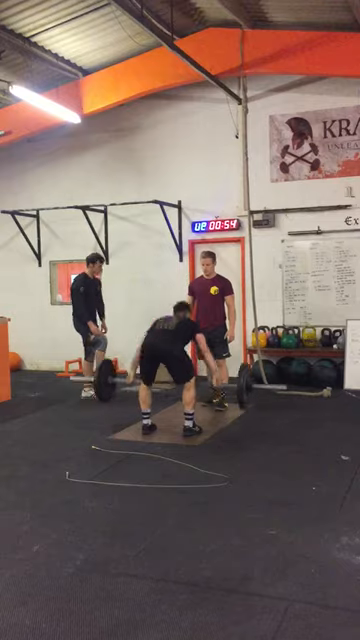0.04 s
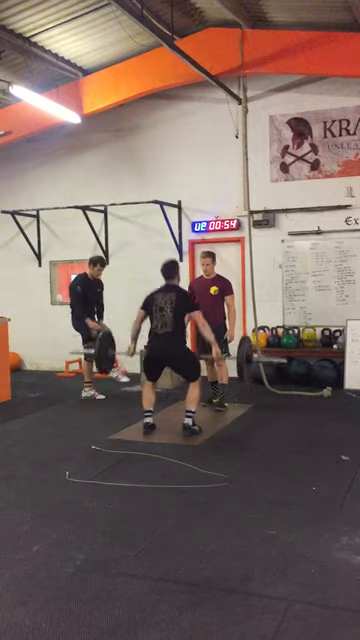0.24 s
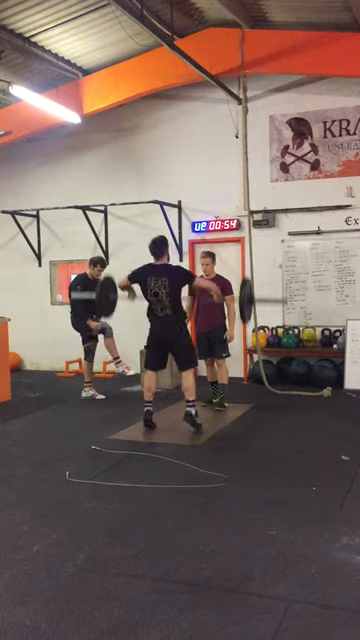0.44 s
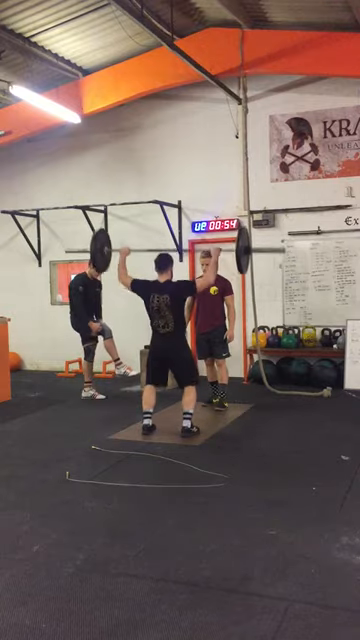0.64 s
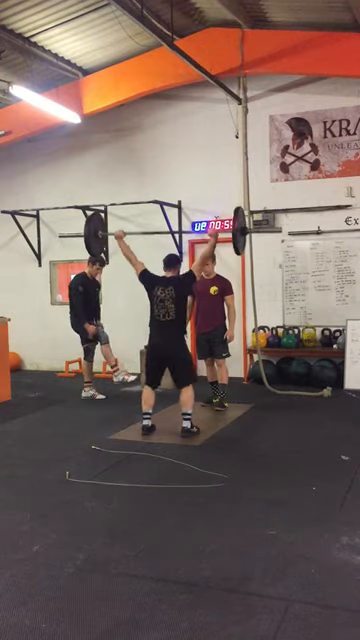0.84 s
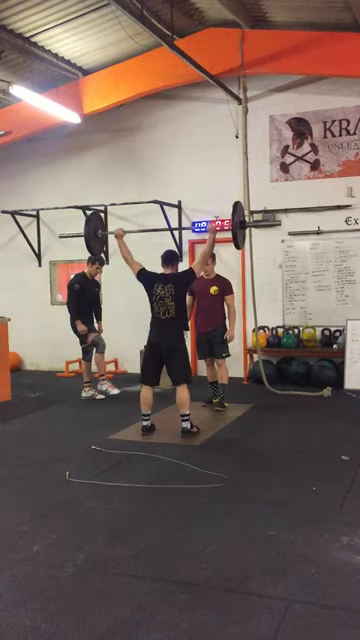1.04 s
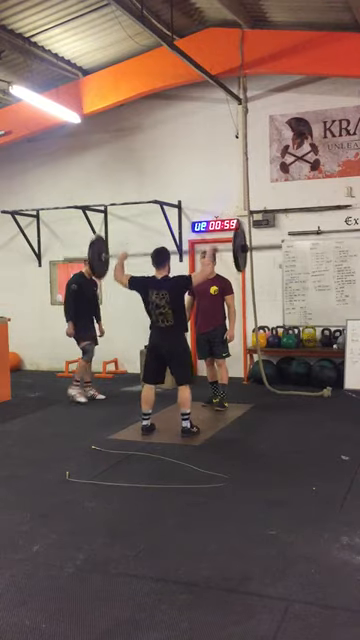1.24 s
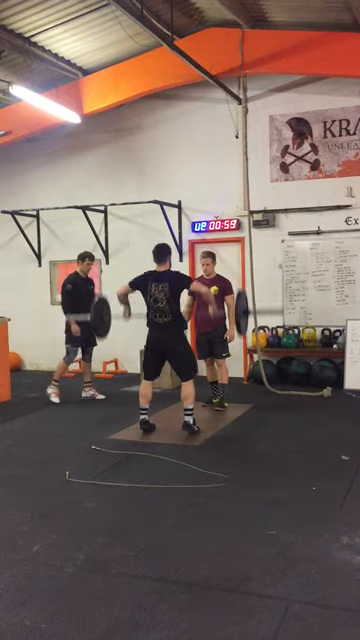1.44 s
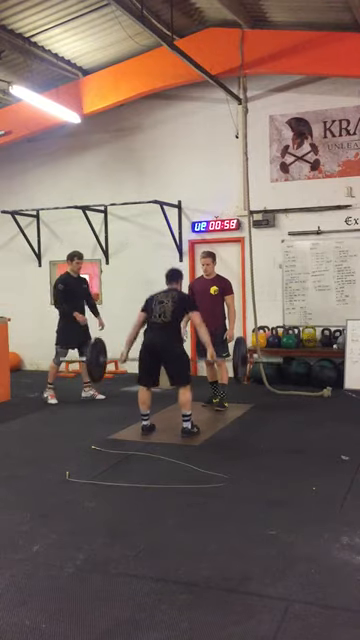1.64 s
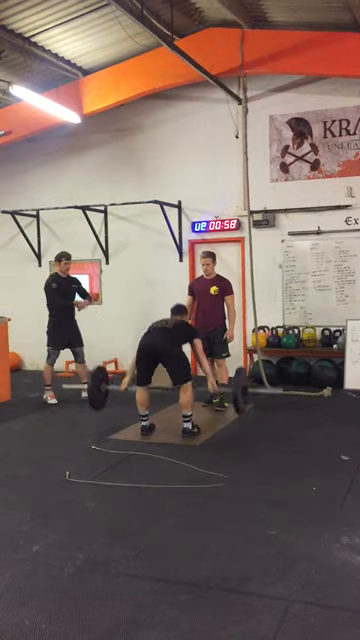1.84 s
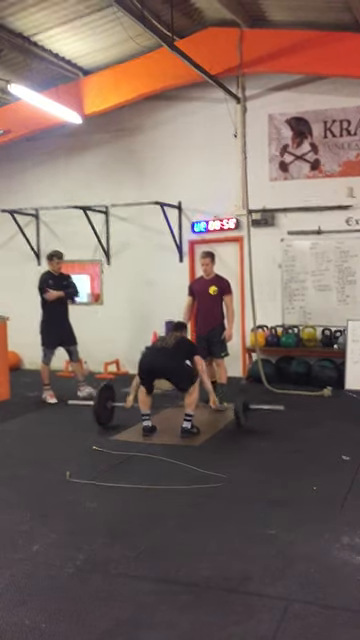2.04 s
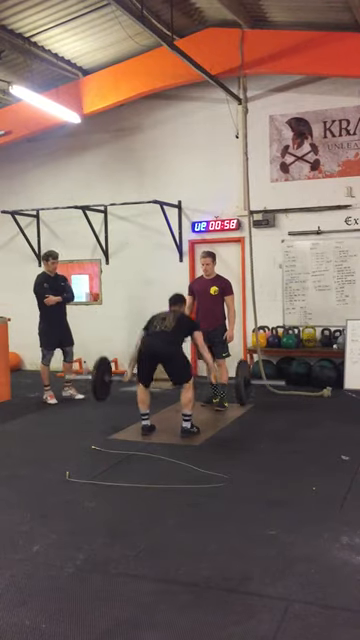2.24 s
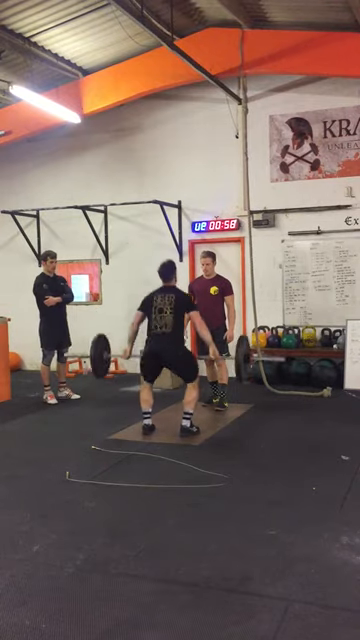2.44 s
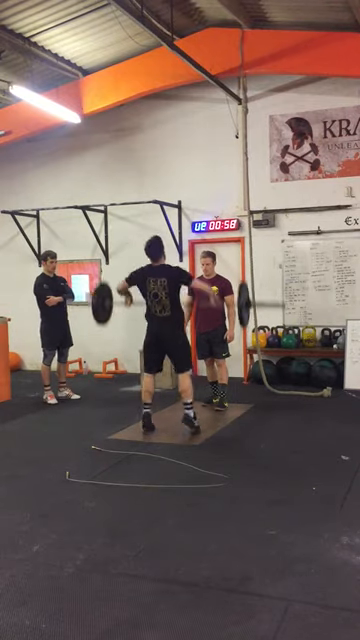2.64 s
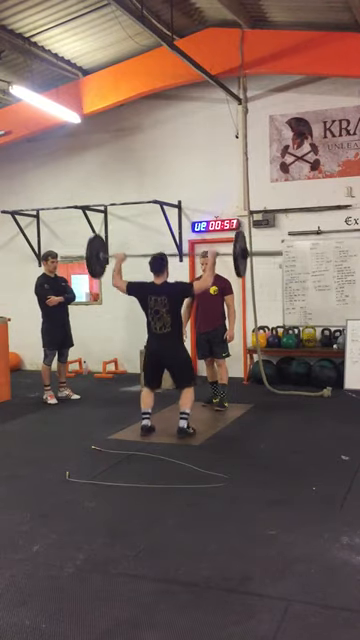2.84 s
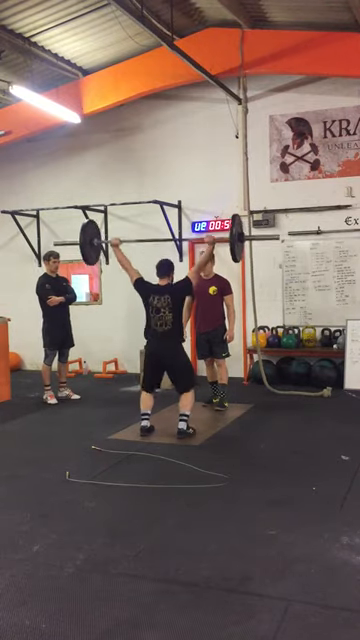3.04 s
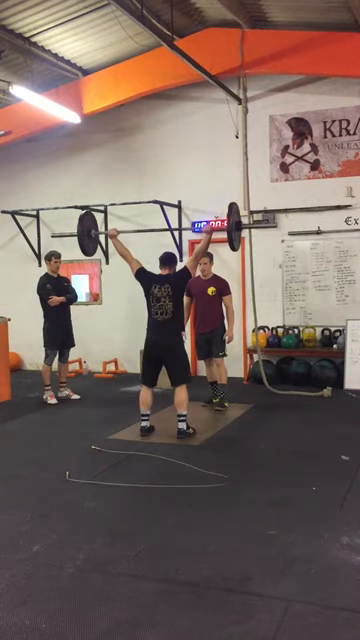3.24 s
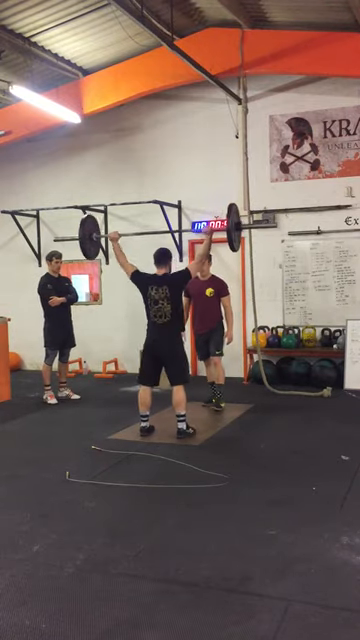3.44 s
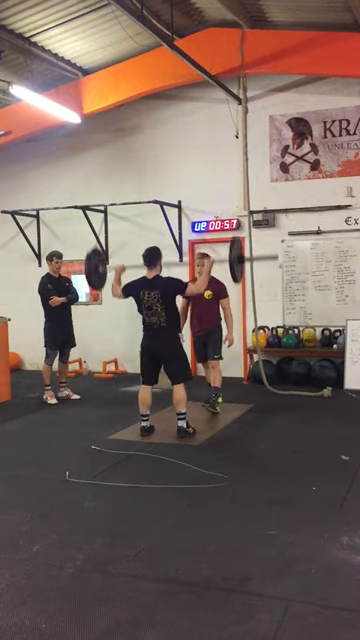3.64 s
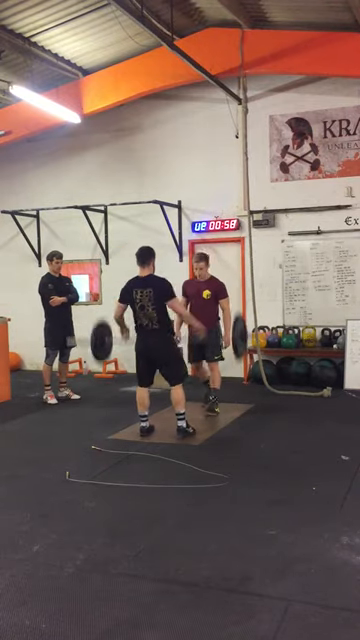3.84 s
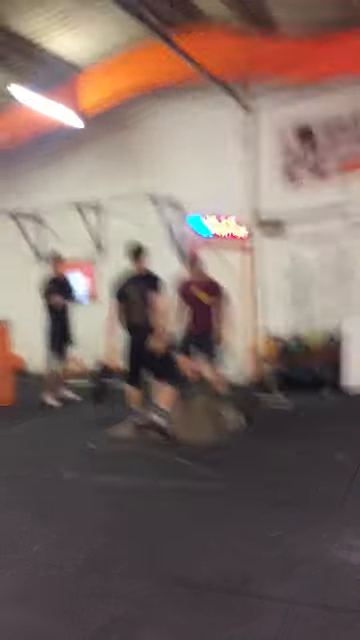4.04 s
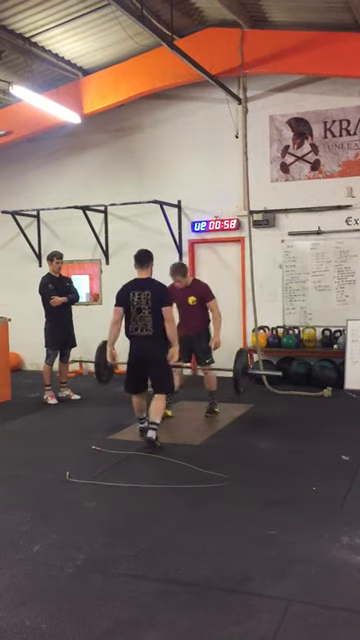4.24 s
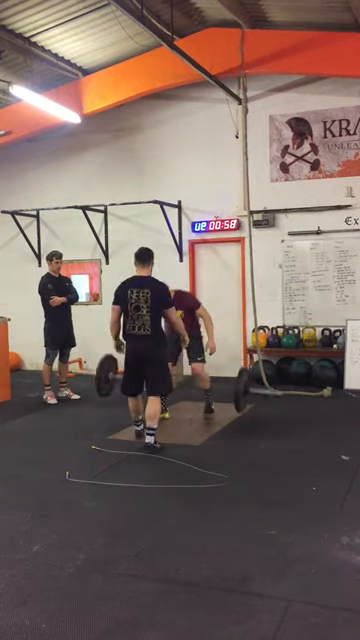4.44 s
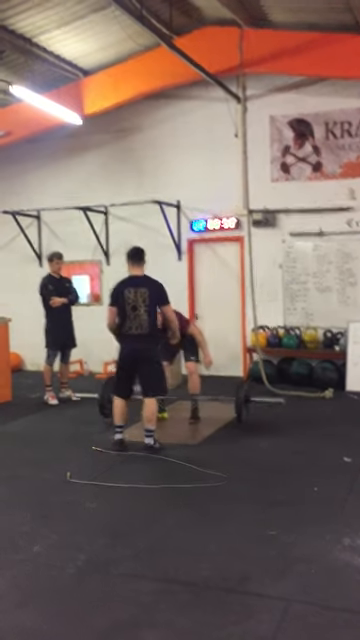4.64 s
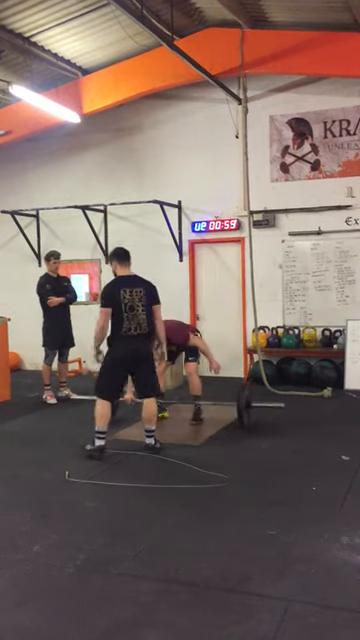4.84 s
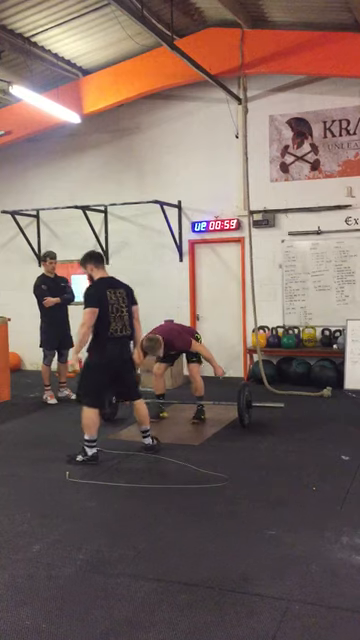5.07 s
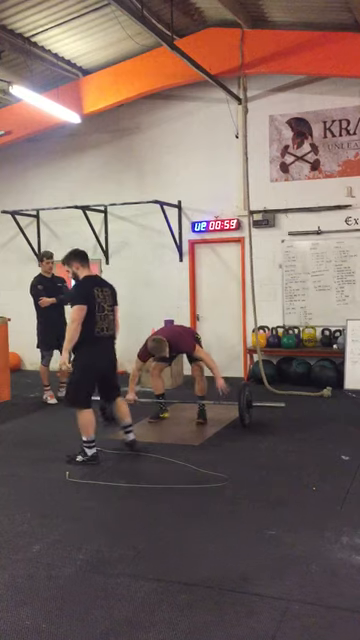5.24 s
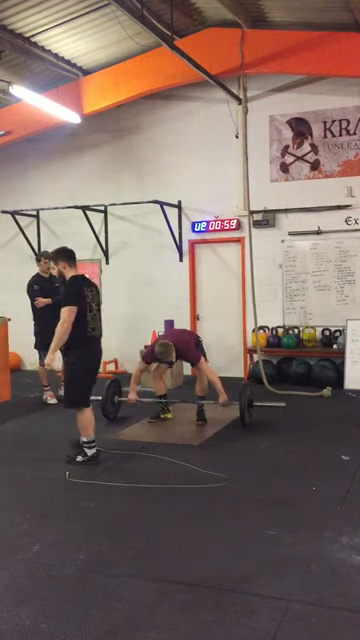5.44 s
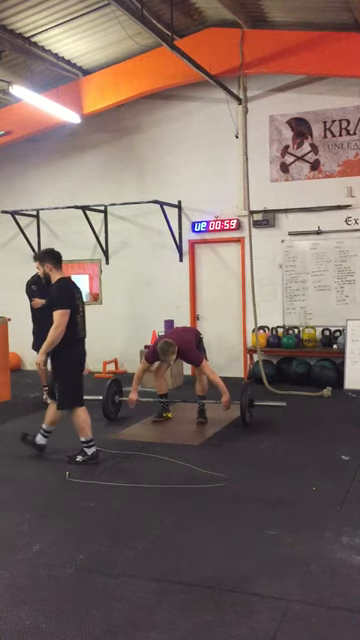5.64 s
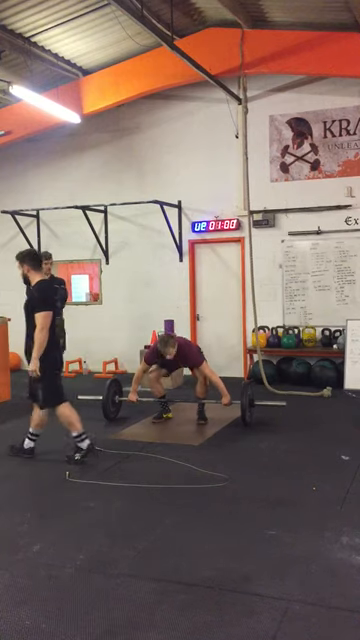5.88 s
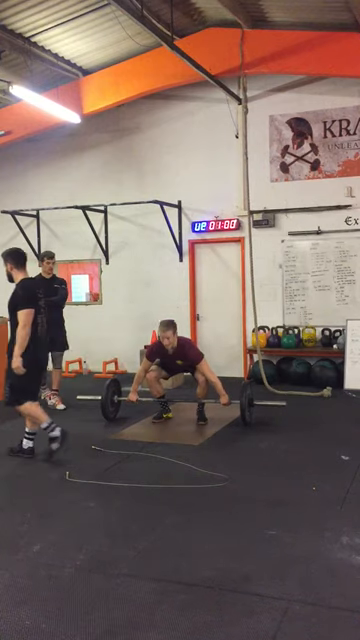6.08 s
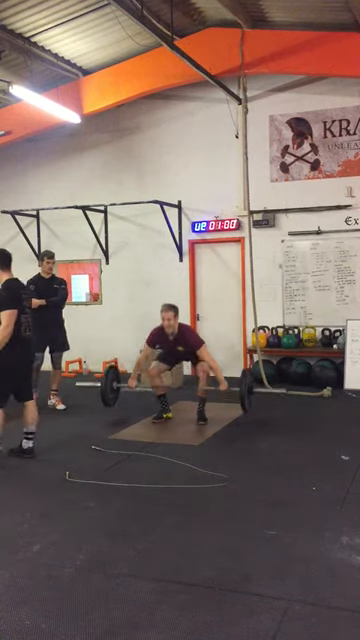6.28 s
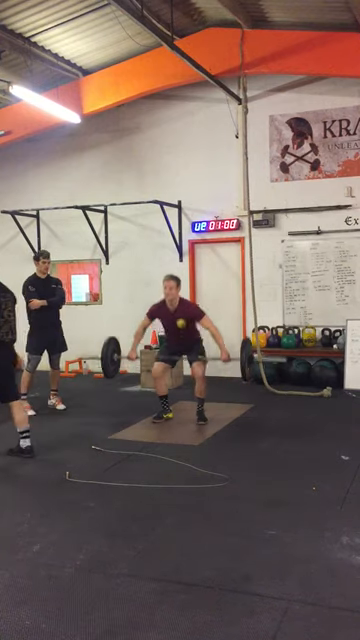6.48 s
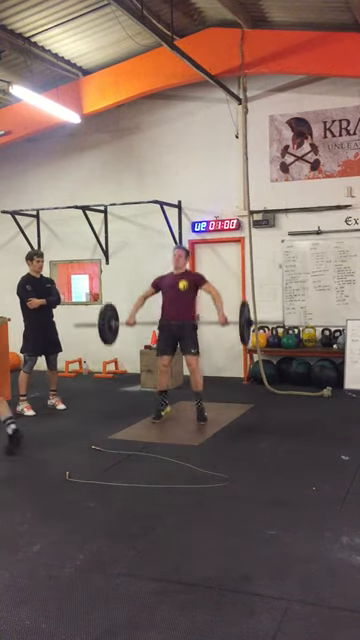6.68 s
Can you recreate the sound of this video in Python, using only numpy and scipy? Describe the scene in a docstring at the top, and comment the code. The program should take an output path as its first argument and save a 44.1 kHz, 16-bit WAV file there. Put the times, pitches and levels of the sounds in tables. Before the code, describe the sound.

A loaded barbell drops onto a rubber floor several times, with deep thuds and bright metal clashes echoing through a large gym.

```python
"""A barbell with rubber plates is lifted and dropped on the rubber floor of a large, hard-walled gym.
Each landing is a deep rubber thud under a bright clash of loose plate hubs on the steel sleeves;
the big drop shakes the slab and bounces twice. Between landings the bar clanks, the collars jingle,
the sleeves spin and shoes stamp on the platform. Every hit is a burst of tiny contacts ringing an
object's resonances. The hall rings for seconds over a low rush of ventilation."""
import sys
import numpy as np
from scipy import signal
from scipy.fft import rfft, irfft
from scipy.io import wavfile
from scipy.ndimage import uniform_filter1d

SR = 44100
rng = np.random.default_rng(int(sys.argv[2]) if len(sys.argv) > 2 else 0)


def store_pcm(level_fs):
    """Save levels as 16-bit WAV."""
    pcm = np.round(np.clip(level_fs, -1, 1) * 32767).astype(np.int16)
    wavfile.write(sys.argv[1], SR, np.atleast_2d(pcm).T)


N = 295911
LEAD = SR // 4  # samples of pre-roll, so the scene opens on a landing that still rings
SPOTS = 4  # places where an object is struck, each a track with its own reflections

# The bar lands or bounces, one end first. Each row: start, skew between the ends, lag of the hubs and
# contact time, all in seconds; first thud, second thud and floor boom in dB; rubber tilt in dB per
# octave; hub clash in dB; clash tilt in dB per octave.
LANDINGS = [(-.075, .02, 0.0045, .014, 16.5, 16.5, 12, -1, 22.5, 2),
            (2.1161, .011, 0.0012, 0.0065, 13.5, 6.5, 10.5, 0, 23.5, 1.48),
            (4.1136, .018, .0105, .004, 27.5, 25, 17.5, 1, 26, 3),
            (4.658, .046, .012, .015, 19.5, 22, 18, 1.5, 24.5, 2.5),
            (4.9, .06, 0.003, 0.014, 4.5, 14, 4, -2.5, 18, 3)]


def rubber_thuds():
    """The rim grazes the floor, each end of the bar thuds down, then the floor booms."""
    # The rubber's dark tone. Each row: frequency in Hz, level in dB.
    body = [(20, -41), (36, -20.5), (52, -5), (125, -1), (260, 0.5), (450, -4.5), (700, -8.5), (1000, -15),
            (2000, -17.5), (5000, -62.5), (15000, -110)]
    # Its low resonances. Each row: centre in Hz, width in Hz, boost in dB.
    modes = [(70.5, 8.4, 3.2), (103.5, 14, 1.4), (138, 48, 4.8), (205, 110, 3.5), (342.4, 65, 2),
             (567, 63, 3.6)]
    graze_s, softer_s, boom_s = .0045, .007, .07
    hits = []
    for start, skew, _, contact, first_db, second_db, boom_db, tilt, _, _ in LANDINGS:
        boom_at = start + .025 + 2.2 * skew  # later the more lopsided the landing
        hits += [(start - graze_s, first_db - 15, graze_s, tilt + 6.5),
                 (start, first_db, contact, tilt),
                 (start + skew, second_db, contact + softer_s, tilt),
                 (boom_at, boom_db, boom_s, tilt - 5)]
    return strike(hits, body, modes, per_s=4000, attack=.91)


def hub_clashes():
    """Loose hubs tick on the sleeves, clash short and bright at one end, then longer and duller."""
    # The steel's bright tone. Each row: frequency in Hz, level in dB.
    body = [(40, -49.5), (200, -15), (500, -13), (950, -6.5), (1200, -3), (1500, -2), (2100, 0.5),
            (2900, 2), (3600, 0), (5600, -2.5), (7600, -10.5), (9800, -12.5), (11000, -18.5), (15500, -21)]
    # Its resonances. Each row: centre in Hz, width in Hz, boost in dB.
    modes = [(1150, 90, 4), (1240, 90, 5), (1509, 50, 4), (2205, 70, 3), (2440, 70, 3), (2960, 90, 4),
             (3075, 90, 6), (3170, 80, 7), (3260, 70, 4), (3490, 60, 4), (3900, 80, 4), (4290, 100, 5),
             (4735, 90, 4), (5100, 100, 4), (5358, 60, 5), (5580, 170, 9), (6060, 100, 8), (6555, 110, 7),
             (6826, 50, 5), (7040, 120, 8), (7528, 130, 8), (8030, 130, 11), (8330, 150, 4),
             (8590, 130, 12), (9110, 150, 9), (9830, 500, 7), (10800, 200, 5), (11370, 120, 6),
             (11980, 120, 9), (13150, 350, 4), (14330, 150, 4)]
    # Plates rattle as the bar rebounds and settles.
    # Each row: start in seconds, level in dB, rattle time in seconds, tilt in dB per octave.
    rattles = [(4.4, 11, 0.21, 1), (5.07, 11, .09, -0.2), (5.24, 10.5, .16, -2)]
    hits = []
    for start, skew, lag, contact, first_db, second_db, _, _, db, tilt in LANDINGS:
        rattle_s = .004 + .66 * skew  # a lopsided landing rattles longer
        lean_db = .17 * (first_db - second_db)  # favours the end that lands harder
        hits += [(start, db - 12 + lean_db, contact, tilt),
                 (start + lag, db - 4 + lean_db, rattle_s, tilt + 2),
                 (start + lag + skew, db - 2.5 - lean_db, rattle_s + .019, tilt - 2)]
    return strike(hits + rattles, body, modes, per_s=6000, attack=.034)


def slab_shock():
    """The weight pushes the floor slab down; a few low modes swing back and die quickly."""
    # The slab's modes. Each row: frequency in Hz, level in dB, 60 dB decay time in seconds.
    modes = [(97, -17.5, .25), (124, -9, 0.23), (214, -10, 0.48), (300, -12, 0.053), (510, -10.5, 0.063)]
    hard_db, growth = 27, 1.7  # a hard thud; dB of shock per dB of thud
    t, out = np.arange(SR // 2) / SR, np.zeros((1, N + LEAD))
    punch = -sum(amp(db - 60 * t / t60) * np.sin(2 * np.pi * hz * t) for hz, db, t60 in modes)
    for start, _, _, _, thud_db, *_ in LANDINGS:
        add(out, start, amp(-2.5 + growth * (thud_db - hard_db)) * punch[None])
    return out[0, LEAD:]


def overhead_catch():
    """The shaft clanks as the bar is caught overhead."""
    # Each row: start in seconds, level in dB, rattle time in seconds, tilt in dB per octave.
    clanks = [(.821, 3.5, .0045, -.7), (.828, 6.5, .0055, -3.5), (.84, 5, .0055, -4)]
    # The shaft's tone. Each row: frequency in Hz, level in dB.
    body = [(300, -27.5), (1200, -10.5), (2500, -4), (3200, 1), (4400, -9), (5500, -1), (7000, -13.5),
            (10000, -13.5), (12000, -23.5), (15500, -23)]
    # Its resonances. Each row: centre in Hz, width in Hz, boost in dB.
    modes = [(3106, 160, 8.7), (3030, 87, 2), (4050, 150, 11), (4365, 370, 13), (6500, 110, 13),
             (7100, 160, 22)]
    return strike(clanks, body, modes, per_s=2100, attack=.15)


def collar_jingles(count=4, chink_s=.011, spread_db=.5, fade_db=-7.5):
    """Each jerk of the bar shakes a few uneven, fading chinks out of the collars."""
    # Each row: start in seconds, level in dB, length in seconds, tilt in dB per octave.
    jingles = [(0.326, -3.5, 0.085, -2), (0.693, -11, .11, -1.5), (0.851, -13, .13, 7),
               (1.352, -19, 0.052, 6), (1.642, -26.5, 0.01, -0.5), (1.747, -33, 0.025, 2.5),
               (2.657, -22, .12, -0.5), (2.84, -8.5, .14, 3.5), (3.03, -11, .15, 2),
               (3.585, -28, .02, -3.5), (5.548, -11, .06, 2.5), (6.308, -35.5, .05, 12)]
    # The collars' thin tone. Each row: frequency in Hz, level in dB.
    body = [(500, -51.5), (3000, -5.5), (5600, 0.5), (7200, -10.5), (10000, -9.5), (11800, -21),
            (15500, -21)]
    # Their high resonances. Each row: centre in Hz, width in Hz, boost in dB.
    modes = [(5640, 260, 10), (8230, 260, 13), (9950, 480, 18), (10800, 280, 9), (13100, 330, 23),
             (14200, 330, 16)]
    chinks, order = [], np.arange(count)
    for start, db, length, tilt in jingles:
        progress = (order + rng.uniform(-.5, .5, count) * (order > 0)) / count
        shares = unit(amp(fade_db * progress + spread_db * rng.standard_normal(count)))
        for at, share in zip(start + length * progress, shares):
            chinks.append((at, db + 20 * np.log10(share), chink_s, tilt))
    return strike(chinks, body, modes, per_s=760, attack=.1, vary=.27)


def pickup_clinks():
    """The bar knocks against its hubs as it is pulled off the floor."""
    # Each row: start in seconds, level in dB, rattle time in seconds, tilt in dB per octave.
    clinks = [(6.181, -14, .006, -6), (6.193, -5, .008, -2.5), (6.21, -6.5, .04, -2)]
    # The hubs' tone. Each row: frequency in Hz, level in dB.
    body = [(300, -10.5), (2000, -5.5), (3400, -5.5), (5000, -9), (6000, -11), (7400, -19), (8600, -23.5),
            (10200, -16.5), (11300, -23.5), (15500, -33.5)]
    # Their resonances. Each row: centre in Hz, width in Hz, boost in dB.
    modes = [(3133, 300, 7), (4500, 700, 11), (5250, 420, 13), (6670, 650, 12), (8020, 500, 22),
             (9550, 800, 15), (10620, 450, 9), (13300, 500, 7)]
    return strike(clinks, body, modes, per_s=1900, attack=.52)


def sleeve_spin(start_s=3.88, peak_s=3.99, end_s=4.12):
    """The sleeves chatter on the shaft, spinning up as the bar is let go and running down as it falls."""
    # The sleeves' tone. Each row: frequency in Hz, level in dB.
    body = [(300, -11), (1000, 5.5), (2500, 0.5), (4000, -2.5), (5500, -10), (7000, -11), (9000, -20.5),
            (10500, -11), (11800, -19.5), (15500, -21.5)]
    # Their resonances. Each row: centre in Hz, width in Hz, boost in dB.
    modes = [(1200, 250, 7), (2130, 150, 5), (2433, 160, 11), (2740, 170, 11), (3100, 280, 9),
             (3850, 200, 7), (4280, 220, 15), (4720, 220, 13), (5150, 200, 15), (5620, 260, 19),
             (6000, 200, 9), (6560, 240, 17), (7050, 240, 14), (7530, 200, 10), (8210, 300, 21),
             (8560, 170, 14), (9130, 200, 11), (9900, 600, 12), (10820, 230, 13), (13050, 480, 19),
             (14180, 400, 12), (15050, 300, 12)]
    rise_db_per_s, fall_db_per_s = 379.5, 100
    t, out = np.arange(start_s, end_s, 1 / SR) - peak_s, np.zeros((SPOTS, N + LEAD))
    swell = amp(-34.5 + np.minimum(rise_db_per_s * t, -fall_db_per_s * t))
    chatter = contacts((SPOTS, SR), per_s=770)
    whirr = signal.fftconvolve(chatter, ring(body, modes)[None], axes=1)[:, :len(t)]
    add(out, start_s, whirr / whirr.sum(0).std() * swell)
    return out


def footfalls(stamp_s=.019, sole_tilt=-1.5):
    """Each shoe thumps the platform's board, duller the slower it lands, and its sole slaps."""
    # Each row: start in seconds, board thump in dB, sole slap in dB, contact time in seconds.
    steps = [(.38, 0.5, -24.5, .06), (.68, -4.5, -16, 0.046), (1.15, -24, -5.5, .027),
             (1.59, -12, -25, 0.052), (1.7, -10, -32.5, .08), (1.79, -15.5, -18.5, .04),
             (2.995, -2, -16.5, .016), (3.26, -10.5, -14, .04), (3.47, -8.5, -21, .06),
             (3.72, -7.5, -17.5, 0.062), (6.2, -20.5, -12.5, 0.038), (6.585, -11.5, -28, 0.025)]
    # The tones of board and sole. Each row: frequency in Hz, level in dB.
    board = [(30, -35), (130, 5), (300, -0.5), (600, 3.5), (1300, -1.5), (2200, -10.5), (4000, -63.5),
             (8000, -32.5), (15000, -44)]
    sole = [(150, -30), (700, -8), (950, 1.5), (1800, 0), (3000, -9), (6000, -17), (15000, -38)]
    # Their resonances. Each row: centre in Hz, width in Hz, boost in dB.
    board_modes = [(165, 110, 4), (390, 120, 3), (1000, 300, 2)]
    sole_modes = [(1050, 160, 3), (1530, 160, 2), (1780, 200, 4.6)]
    thumps = [(start, db, contact, -2.5 * np.log2(contact / stamp_s)) for start, db, _, contact in steps]
    slaps = [(start, db, contact, sole_tilt) for start, _, db, contact in steps]
    return (strike(thumps, board, board_modes, per_s=500, attack=.16)
            + strike(slaps, sole, sole_modes, per_s=1700, attack=.2))


def near_field(x, direct_db, early_db, early_t60):
    """Direct sound plus early reflections off the floor and near walls, different for each spot."""
    t = np.arange(SR // 2) / SR
    early = contacts((SPOTS, len(t)), per_s=4000) * amp(-60 * t / early_t60) * (t > .002)
    response = amp(early_db) * unit(early) * np.sqrt(SPOTS)
    response[:, 0] += amp(direct_db)
    return signal.fftconvolve(x, response, axes=1).sum(0)[LEAD:LEAD + N]


def hall_tail(x, build_s=.0031):
    """The hard walls return a long, diffuse tail that swells in milliseconds and darkens as it fades."""
    # The hall's ring. Each row: frequency in Hz, 60 dB decay time in seconds.
    decay_times = [(50, 4.1), (120, 0.32), (260, 3.09), (700, 2.83), (1500, 3.43), (3000, 2.6),
                   (5000, 1.765), (7500, 1.15), (10000, 0.9), (14000, 0.67)]
    t = np.arange(SR * 3) / SR
    hz, at, noise = signal.stft(rng.standard_normal((SPOTS, len(t))), SR, nperseg=512)
    decay = amp(-60 * at / curve(decay_times, hz)[:, None])
    tail = signal.istft(noise * decay, SR, nperseg=512)[1][:, :len(t)]
    response = tail * (1 - np.exp(-t / build_s)) / np.sqrt(SR / 6)
    return signal.fftconvolve(x, response, axes=1).sum(0)[LEAD:LEAD + N]


def ventilation(level_db=-53.5):
    """Moving air lays a steady low rush under the scene."""
    # The air's tone. Each row: frequency in Hz, level in dB.
    tone = [(20, -24.5), (45, -3.5), (80, 5.5), (140, 5), (300, -16.5), (600, -25.5), (1500, -39.5),
            (4000, -24), (8000, -32.5), (15000, -38.5)]
    gain = amp(curve(tone, np.fft.rfftfreq(N, 1 / SR)))
    rush = irfft(rfft(rng.standard_normal(N)) * gain, N)
    return amp(level_db) * rush / rush.std()


def strike(hits, body, modes, per_s, attack, vary=.14, size=16384):
    """Each hit rings an object with one click of strength `attack` and a dying chatter of contacts."""
    t, out = np.arange(size) / SR, np.zeros((SPOTS, N + LEAD))
    for k, (start, db, rattle_s, tilt) in enumerate(hits):
        chatter = unit(contacts(size, per_s) * np.exp(-(t / rattle_s) ** 2 / 2))
        spot = rng.integers(0, SPOTS, size)
        force = chatter * (spot == np.arange(SPOTS)[:, None])
        force[k % SPOTS, 0] -= attack
        # where a hit lands decides how strongly each resonance answers
        struck = [(hz, width, boost * (1 + vary * rng.uniform(-1.9, 1))) for hz, width, boost in modes]
        sound = signal.fftconvolve(force, ring(body, struck, tilt)[None], axes=1)
        add(out, start, amp(db) * unit(sound))
    return out


def ring(body, modes, tilt=0, size=8192):
    """An object's answer to one click: the narrower a resonance, the longer it rings."""
    hz = abs(np.fft.fftfreq(size, 1 / SR))
    peaks_db = sum(db * .5 ** ((2 * (hz - centre) / width) ** 2) for centre, width, db in modes)
    octaves = np.log2(np.clip(hz, 55, 16000))
    log_gain = np.log(amp(curve(body, hz) + tilt * octaves + peaks_db))
    minimum_phase = np.exp(np.conj(signal.hilbert(log_gain)))  # nothing sounds ahead of the click
    return unit(np.fft.ifft(minimum_phase).real[:size // 2])


def contacts(shape, per_s):
    """A random run of clicks of uneven size."""
    return rng.standard_normal(shape) * (rng.random(shape) < per_s / SR)


def amp(db):
    """Turns decibels into gain."""
    return 10 ** (np.asarray(db) / 20)


def unit(x):
    """Scales to an energy of one."""
    return x / (np.linalg.norm(x) + 1e-20)


def curve(points, hz):
    """Joins points by straight lines over log frequency."""
    point_hz, values = np.transpose(points)
    return np.interp(np.log(hz + 1), np.log(point_hz + 1), values)


def add(tracks, start_s, sound):
    """Lays a sound into tracks that begin with the pre-roll."""
    part = tracks[:, max(round(start_s * SR) + LEAD, 0):][:, :sound.shape[1]]
    part += sound[:, :part.shape[1]]


def suppress_noise(x, depth_db, margin_db):
    """Turns each band down as it sinks towards its own noise floor, which shortens the tails."""
    hz, _, bands = signal.stft(x, SR, nperseg=1024, noverlap=768)
    power = uniform_filter1d(abs(bands) ** 2, size=9, axis=-1)  # smooth over time
    power = uniform_filter1d(power, size=3, axis=-2)  # and over frequency
    floor = np.percentile(power, 12, axis=-1, keepdims=True) * amp(margin_db) ** 2
    spare_bass = np.clip(hz / 600, 0, 1)[:, None]
    cut_db = depth_db * floor / (floor + abs(power) + 1e-30) * spare_bass
    return signal.istft(bands / amp(cut_db), SR, nperseg=1024, noverlap=768)[1][:, :N]


def scene():
    """Rubber, steel and shoes share one hall; the slab and the ventilation stay dry."""
    thuds = rubber_thuds()
    clashes = hub_clashes()
    catch = overhead_catch()
    fittings = collar_jingles() + pickup_clinks() + sleeve_spin()
    shoes = footfalls()
    mix = near_field(thuds, direct_db=-15, early_db=-11, early_t60=.27)
    mix += near_field(clashes, direct_db=-5.5, early_db=-7.5, early_t60=.2)
    mix += near_field(catch, direct_db=-11.5, early_db=-11.5, early_t60=.72)
    mix += near_field(fittings + shoes, direct_db=-7, early_db=-8.5, early_t60=.97)
    send = amp(-10) * thuds + amp(-1.5) * clashes + amp(-9) * catch + amp(-4.5) * fittings
    mix += hall_tail(send + amp(-1) * shoes)
    return (mix + slab_shock() + ventilation())[None]


def record(dry):
    """Mild noise suppression, then the microphone sheds deep bass, rounds peaks and trims the top."""
    low_cut_hz, high_cut_hz, ceiling = 42, 15800, .76
    x = suppress_noise(dry, depth_db=9, margin_db=4.5)
    x = signal.sosfilt(signal.butter(3, low_cut_hz, "highpass", fs=SR, output="sos"), x)
    rounded = x / (1 + (x / ceiling) ** 6) ** (1 / 6)
    lowpass = signal.firwin(511, high_cut_hz, window=("kaiser", 8), fs=SR)
    return signal.oaconvolve(rounded, lowpass[None], "same")


dry = scene()
out = record(dry)
store_pcm(out)
```